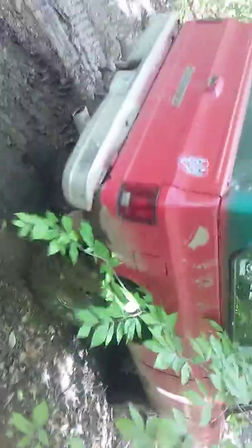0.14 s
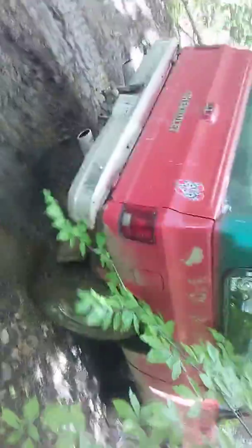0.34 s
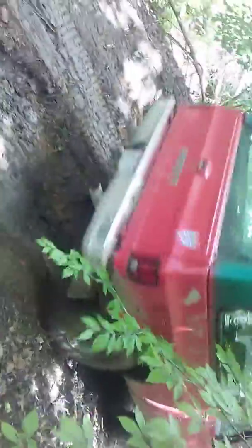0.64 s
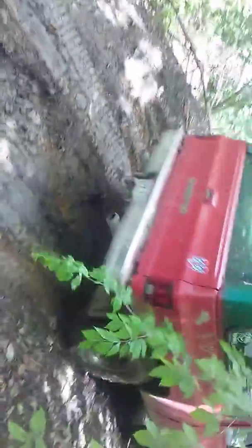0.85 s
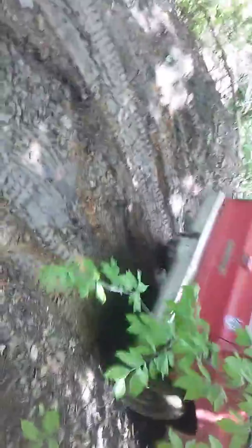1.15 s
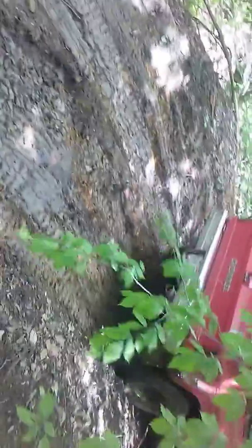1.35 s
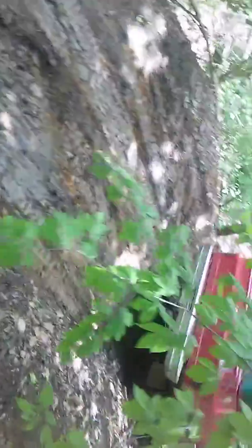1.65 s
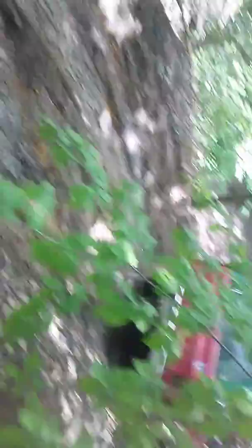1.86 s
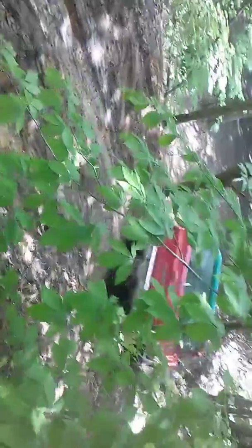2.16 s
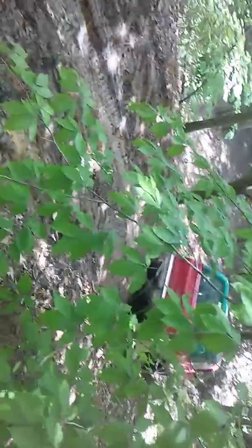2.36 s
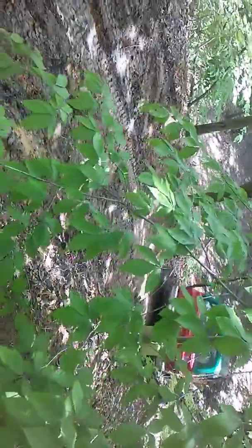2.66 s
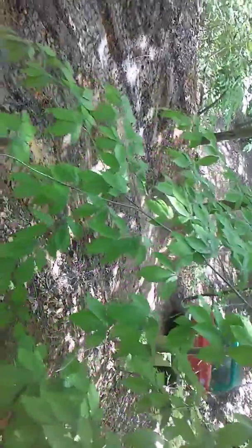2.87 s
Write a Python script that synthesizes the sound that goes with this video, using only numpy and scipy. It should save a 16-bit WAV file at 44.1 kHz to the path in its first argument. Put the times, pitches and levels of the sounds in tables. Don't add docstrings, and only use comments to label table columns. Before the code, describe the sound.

Close, uneven truck exhaust throbs and rattles outdoors, then grows boomier and recedes; twigs snap, stones knock, a gear whines briefly, metal squeaks, and leaves brush bodywork at the end, caught by a thin small microphone.

```python
import sys
import numpy as np
from scipy import signal
from scipy.io import wavfile
from scipy.ndimage import uniform_filter1d

SR = 44100
rng = np.random.default_rng(int(sys.argv[2]) if len(sys.argv) > 2 else 0)


def boost_factor(decibels):
    exponent = np.asarray(decibels, float) / 20
    return 10 ** exponent


def store_pcm(level_fs):
    pcm = np.round(np.clip(level_fs, -1, 1) * 32767).astype(np.int16)
    wavfile.write(sys.argv[1], SR, np.atleast_2d(pcm).T)


N = 132300


def rms_one(x):
    return x / np.sqrt(np.mean(x ** 2) + 1e-20)


def in_time(rows):
    s, *columns = np.transpose(rows)
    return [np.interp(np.arange(N) / SR, s, c) for c in columns]


def drift(rate):
    points = rng.standard_normal(1500)
    wander = np.interp(np.arange(N) / SR * rate * 2, np.arange(1500), points)
    return uniform_filter1d(wander, size=100) * 1.2


def peak(x, hz, width_hz):
    hz, out, state = np.broadcast_to(hz, N), np.zeros(N), np.zeros(2)
    r = np.exp(-np.pi * width_hz / SR)
    b = [(1 - r * r) / 2, 0, -(1 - r * r) / 2]
    for i in range(0, N, 512):
        a = [1, -2 * r * np.cos(2 * np.pi * hz[i] / SR), r * r]
        out[i:i + 512], state = signal.lfilter(b, a, x[i:i + 512] + 1e-18, zi=state)
    return out


def steep_peak(x, hz, width_hz):
    return rms_one(peak(peak(x, hz, width_hz), hz, width_hz))


def bands(spectrum, patchy_db, count):
    hz, db = np.transpose(spectrum)
    edges = np.geomspace(hz[0], hz[-1], count + 1)
    white, out = rng.standard_normal((2, N)), 0
    for k, (low, high) in enumerate(zip(edges, edges[1:])):
        sos = signal.butter(2, [low, high], "band", fs=SR, output="sos")
        band_db = np.interp(np.log(low * high) / 2, np.log(hz), db)
        out = out + signal.sosfilt(sos, white[k % 2]) * boost_factor(band_db + patchy_db * drift(11))
    return out


# t/s, engine cycles done
CRANK = [(-.205, -3), (.095, 0), (.398, 3), (.708, 6), (1.116, 10), (1.43, 13), (1.743, 16), (2.06, 19),
         (2.37, 22), (2.676, 25), (2.985, 28), (3.29, 31)]


def crank_cycles():
    lead_s, margin = 0.0011, SR // 5
    s, turns = np.transpose(CRANK)
    t = np.arange(-margin, N + margin) / SR + lead_s
    return uniform_filter1d(np.interp(t, s, turns), size=8000)[margin:margin + N]


def firings(cycles, pattern_db, chance):
    spread_db, jitter_s = 1.3, .00025
    number = np.arange(-12, 180)
    at = np.interp(number / 6, cycles, np.arange(N), -1, -1) + chance[:, 0] * jitter_s * SR
    strength = boost_factor(np.array(pattern_db)[number % 6] + spread_db * chance[:, 1])
    keep, out = at > 1, np.zeros(N + 500)
    out[at[keep].astype(int)] = strength[keep]
    return out[:N]


def burst(clicks, hz, length_s):
    t = np.arange(int(length_s * SR)) / SR - length_s / 2
    pulse = np.hanning(len(t)) ** 0.76 * np.cos(2 * np.pi * hz * t)
    return signal.fftconvolve(clicks, pulse, "same")


POP_FIRING_DB = [0, -22, -11, -19, -16, -22]
BOOM_FIRING_DB = [-40, -30, -18, -28, 0, -40]
# t/s, level/dB
UPPER = [(0, -35.5), (.2, -22), (.5, -30.5), (.8, -32.5), (1.3, -34.5), (1.9, -31), (2.4, -40.5),
         (3, -40.5)]


def exhaust_pipe(cycles, chance, pop_db, boom_db):
    boom_early_cycles = 0.0019 * 8.9
    near = firings(cycles, POP_FIRING_DB, chance)
    far = firings(cycles + boom_early_cycles, BOOM_FIRING_DB, chance)
    pops = burst(near * boost_factor(pop_db), hz=237.5, length_s=0.025)
    booms = burst(far * boost_factor(boom_db), hz=232.6, length_s=0.036)
    breath = rms_one(near) + rng.standard_normal(N)
    upper = steep_peak(breath, hz=321.3, width_hz=32) * boost_factor(in_time(UPPER)[0])
    return pops + booms + upper


def rasp(taps, gate, rasp_db, rasp_hz):
    noise = rng.standard_normal(N) * (1.13 + 0.37 * gate)
    return steep_peak(rms_one(taps) + boost_factor(2.5) * noise, rasp_hz, width_hz=198) * boost_factor(rasp_db)


# multiple of cycle rate, level/dB, phase/rad, throb depth 0-1, throb phase/rad
ORDER_LINES = [(8, -31.5, 0.9, 0.41, 2.8), (11, -43, 0.53, 1, 0.26), (18, -25.5, 0.18, 0.39, .4)]


def hum(cycles, hum_db):
    out = 0
    for k, db, phase, depth, throb_phase in ORDER_LINES:
        throb = 1 + depth * np.cos(2 * np.pi * cycles - throb_phase)
        tone = np.sin(2 * np.pi * round(k) * cycles + phase)
        out = out + boost_factor(db + 0.5 + 0.52 * drift(7.3)) * throb * tone
    return out * boost_factor(hum_db)


# f/Hz, level/dB per Hz
ROAR = [(800, 0.8), (1300, -4.5), (1850, -8.5), (2500, -14), (3400, -10.5), (3900, -2), (4400, -11)]


def roar(gate, rasp_db):
    pulse_db = 1.5 * np.tanh(gate - 1)
    return rms_one(bands(ROAR, 0.86, count=10)) * boost_factor(-31.5 + pulse_db + 0.033 * (rasp_db + 22.5))


# f/Hz, level/dB per Hz
RUMBLE = [(40, -8), (65, 5), (120, -5), (175, 10.5), (260, 11.5), (330, 7), (420, -3.1), (560, -3.5)]


def rumble(hum_db):
    return bands(RUMBLE, 1.2, count=10) * boost_factor(-18.0 + .8 * hum_db)


# t/s, level/dB
RATTLE = [(0, -34.5), (.5, -35.5), (.85, -36), (1.1, -47), (1.45, -39), (1.7, -55), (2.5, -48), (3, -45)]


def rattle(gate):
    noise = rng.standard_normal(N) * (1 + 0.21 * gate)
    return steep_peak(noise, hz=457, width_hz=164) * boost_factor(in_time(RATTLE)[0])


# t/s, short pop peak level/dB, long boom peak level/dB, rasp level/dB, rasp f/Hz
PASS = [(0, -16.5, -47.5, -34.5, 641), (.35, -9.5, -29, -28, 600), (.7, -11.5, -22, -26, 626),
        (1.0, -6.5, -12.5, -24.5, 678), (1.3, -9.5, -8, -25.5, 673), (1.65, -13, -5.5, -30, 656),
        (2.1, -12, -5.5, -33.5, 666), (2.5, -12, -10, -31.5, 659), (3, -17, -15, -34, 624)]
# t/s, level/dB
HUM = [(0, 2.5), (.8, 4.5), (1.3, 4), (1.8, 1.5), (2.3, -0.5), (3, -5.5)]
RASP_FIRING_DB = [-2, -9, 0, -9, -1, -9]


def engine():
    cycles = crank_cycles()
    pop_db, boom_db, rasp_db, rasp_hz = in_time(PASS)
    hum_db = in_time(HUM)[0]
    chance = rng.standard_normal((192, 2))
    taps = firings(cycles, RASP_FIRING_DB, chance[::-1])
    gate = rms_one(signal.lfilter([1], [1, -.996], taps))
    tones = exhaust_pipe(cycles, chance, pop_db, boom_db) + hum(cycles, hum_db)
    noises = rasp(taps, gate, rasp_db, rasp_hz) + roar(gate, rasp_db) + rumble(hum_db) + rattle(gate)
    return tones + noises


# t/s, f/Hz, level/dB
WHINE = [(1.93, 395.7, -46), (2.0, 394, -29.5), (2.35, 427.8, -34), (2.42, 431, -68)]


def whine():
    hz, db = in_time(WHINE)
    phase = 2 * np.pi * np.cumsum(hz) / SR
    octave = boost_factor(-3 + 0.83 * drift(12)) * np.sin(2 * phase)
    return boost_factor(db + 0.5) * (np.sin(phase) + octave)


# t/s, peak level/dB, f/Hz, t60/s
KNOCKS = [
    (.366, -24, 1300, .05),
    (.456, -23, 1600, .05),
    (.607, -27, 2000, .05),
    (.633, -19, 1100, .09),
    (2.47, -20, 1350, .06),
    (2.375, -32, 2100, .1),
]


def knocks():
    t, out, white = np.arange(N) / SR, np.zeros(N), rng.standard_normal(N)
    for s, db, hz, t60 in KNOCKS:
        rise = np.clip((t - s) / .002, 0, 1)
        out += steep_peak(white, hz, .7 * hz) * boost_factor(db - 60 * np.abs(t - s) / t60) * rise
    return out


# t/s, level/dB, t60/s
SNAPS = [
    (.7527, -33, 0.075),
    (.755, -45, 0.73),
    (1.332, -50.5, 0.1),
    (1.334, -50, 0.46),
    (2.29, -68, 0.16),
    (2.33, -68, 0.42),
    (2.617, -65.5, 0.33),
]


def snaps():
    t, tail = np.arange(N) / SR, np.zeros(N)
    for s, db, t60 in SNAPS:
        tail += boost_factor(db - 60 * np.abs(t - s) / t60) * (t > s)
    crack = rms_one(peak(rng.standard_normal(N), 3600, 1700)) * boost_factor(9)
    wide = rms_one(bands([(5300, -6.5), (7600, 8.0), (11000, -2.5), (17500, -14)], 0.84, count=6))
    return tail * crack, tail * wide


# t/s, f/Hz, level/dB, length/s, overtone level/dB
SQUEAKS = [
    (1.34, 3500, -16.5, .016, -1),
    (1.37, 3520, -32, .035, -4),
    (2.296, 3420, -24, .014, -10),
    (2.477, 3480, -33, .012, -25),
    (2.625, 4000, -14, .018, -40),
]
# multiple of f, level/dB
OVERTONES = [(2.02, -20), (2.3, -30), (3.03, -28), (3.75, -40)]


def squeaks():
    t, tones, shine = np.arange(N) / SR, np.zeros(N), np.zeros(N)
    roughness = .5
    white, rough = rng.standard_normal(N), 1 + roughness / 2 * drift(150)
    for s, hz, db, length, bright_db in SQUEAKS:
        shape = boost_factor(db) * np.exp(-(2 * (t - s) / length) ** 2) * rough
        scrape = rms_one(peak(white, hz, 300))
        tones += shape * (np.sin(2 * np.pi * hz * t) + roughness * scrape)
        for k, d in OVERTONES:
            shine += shape * boost_factor(d + bright_db) * np.sin(2 * np.pi * k * hz * t)
    return tones, shine


def brush():
    t = np.arange(N) / SR - 2.785
    swell = np.clip(t / .045, 0, 1)
    hz = 2820 + 1500 * np.clip(t, 0, 1)
    rub = rms_one(peak(peak(rng.standard_normal(N), hz, 400), hz, 800))
    airy = bands([(5100, -10.5), (6000, -1.7), (8000, 1.5), (10500, -20.5), (15500, -23)], 0.52, count=5)
    rub_level = boost_factor(-32 + 1.4 * drift(40))
    airy_level = boost_factor(-47 - 13.5 * np.abs(t - .09))
    return swell * rub * rub_level, swell * rms_one(airy) * airy_level


def grind():
    t = np.arange(N) / SR - 1.9
    rub = steep_peak(rng.standard_normal(N), hz=2150, width_hz=220)
    return rub * np.clip(t / 0.44, 0, 1) * boost_factor(-44.5 + 2.9 * drift(8))


# f/Hz, level/dB per Hz
CRUNCH_SPECTRUM = [(5600, -52.5), (6500, 1.5), (7500, 8.5), (9000, -2.5), (11000, -2), (13000, -12.5),
                   (15000, -24), (17500, -15)]
# t/s, level/dB
CRUNCH = [(0, -57), (.35, -57.5), (.65, -56.5), (1.05, -57), (1.3, -64), (1.7, -61), (2.0, -69),
          (2.3, -59.5), (2.55, -71), (3, -84)]


def crunch():
    bright = rms_one(bands(CRUNCH_SPECTRUM, 1.2, count=8))
    return bright * boost_factor(in_time(CRUNCH)[0] + 1.2 * drift(14))


def self_noise():
    return boost_factor(-69) * rng.standard_normal(N)


def scene():
    crack, snap_hiss = snaps()
    squeal, shine = squeaks()
    rub, airy = brush()
    body = engine() + whine() + knocks() + squeal + rub + crack + grind()
    air = crunch() + snap_hiss + shine + airy + self_noise()
    body = signal.sosfilt(signal.cheby2(10, 48, 4440, fs=SR, output="sos"), body)
    body = signal.sosfilt(signal.butter(3, 5000, fs=SR, output="sos"), body)
    air = signal.sosfilt(signal.cheby2(5, 22, 4700, "high", fs=SR, output="sos"), air)
    return (body + air)[None]


def top_cut(x):
    return signal.sosfilt(signal.butter(12, 16070, fs=SR, output="sos"), x)


def record(dry):
    thin = signal.sosfilt(signal.butter(2, 50, "high", fs=SR, output="sos"), dry)
    return top_cut(thin)


dry = scene()
out = record(dry)
store_pcm(out)
```